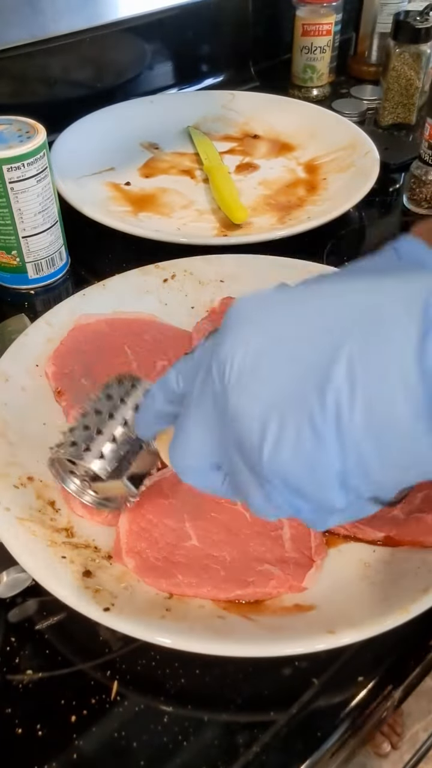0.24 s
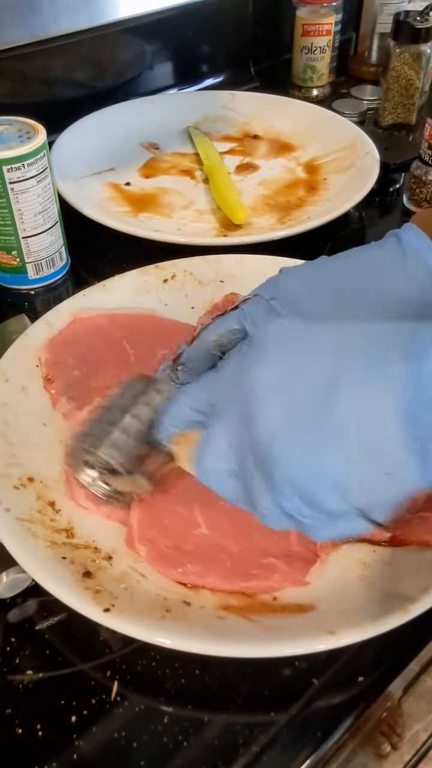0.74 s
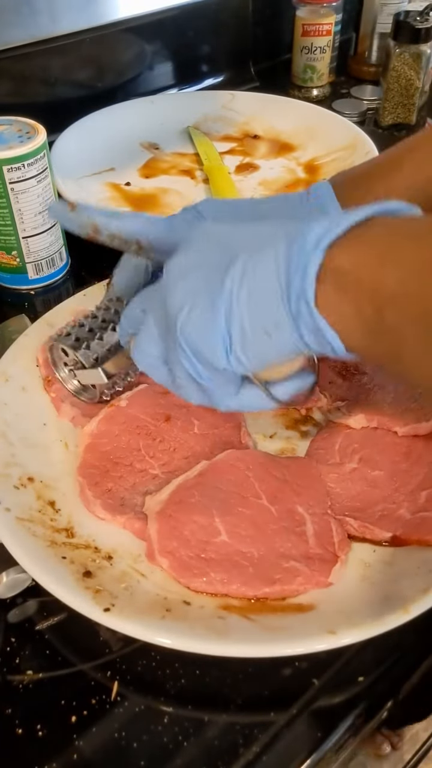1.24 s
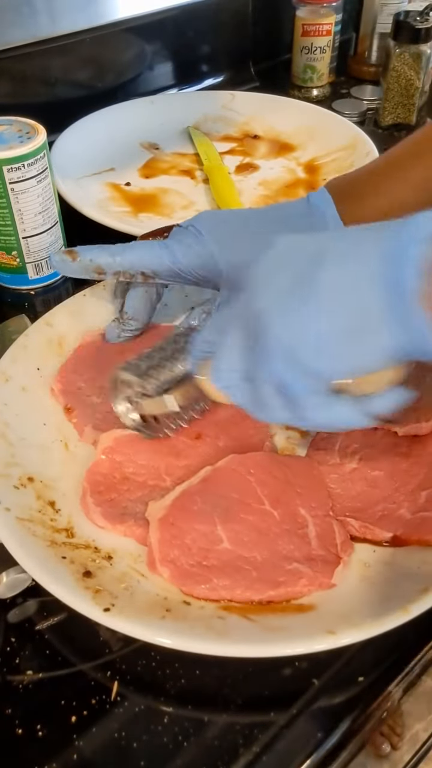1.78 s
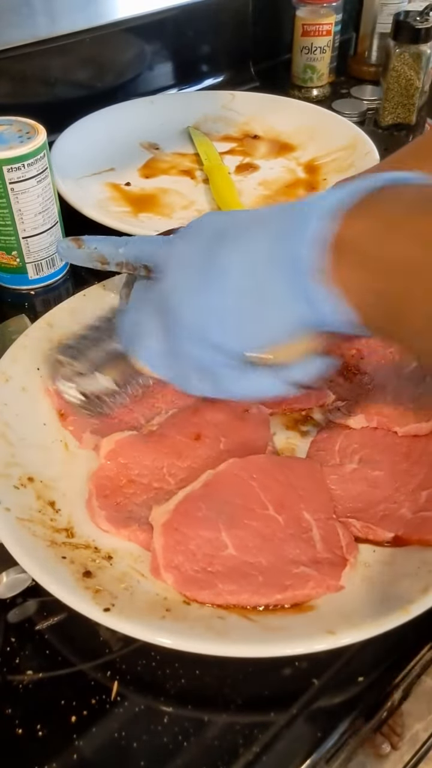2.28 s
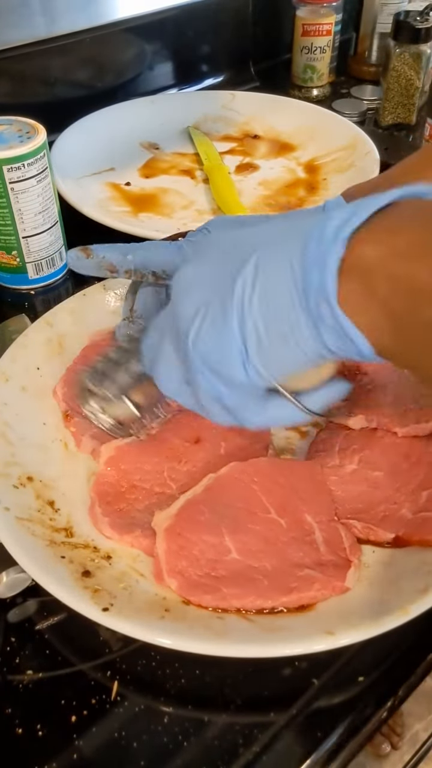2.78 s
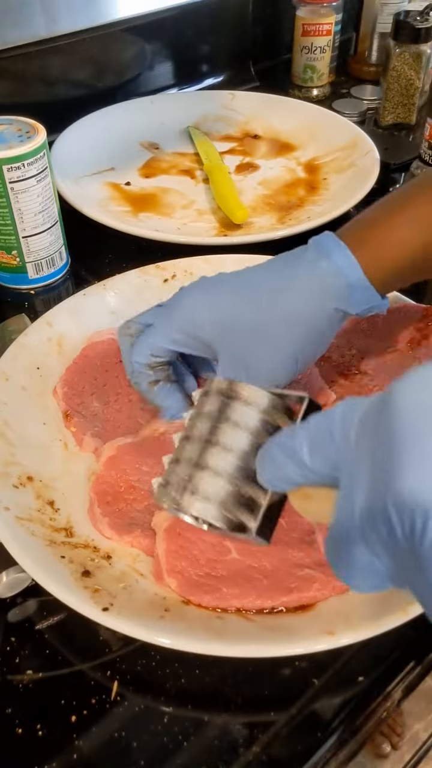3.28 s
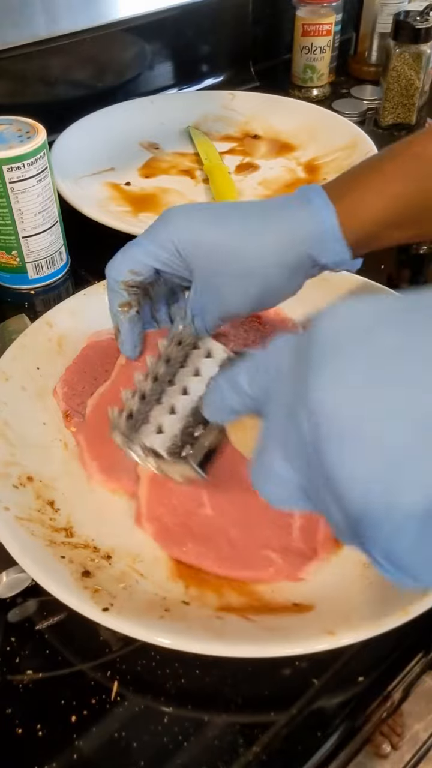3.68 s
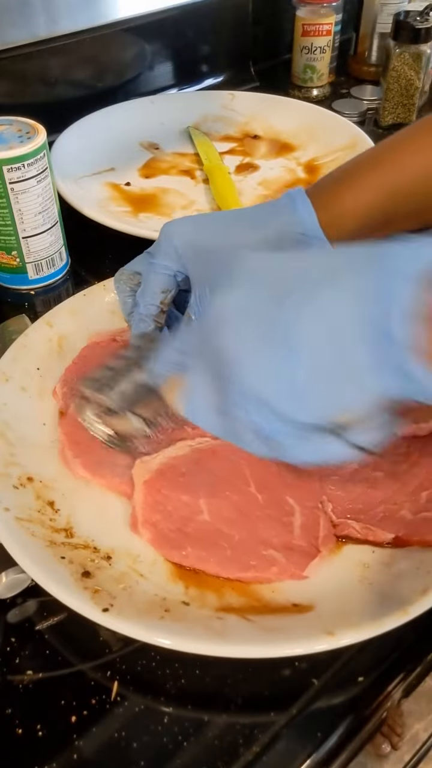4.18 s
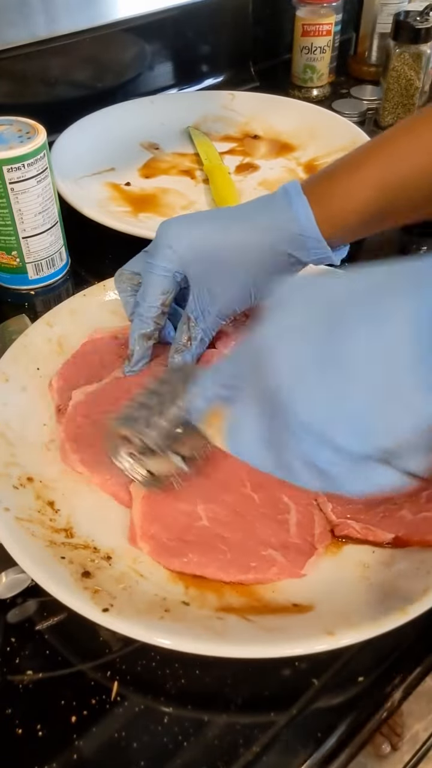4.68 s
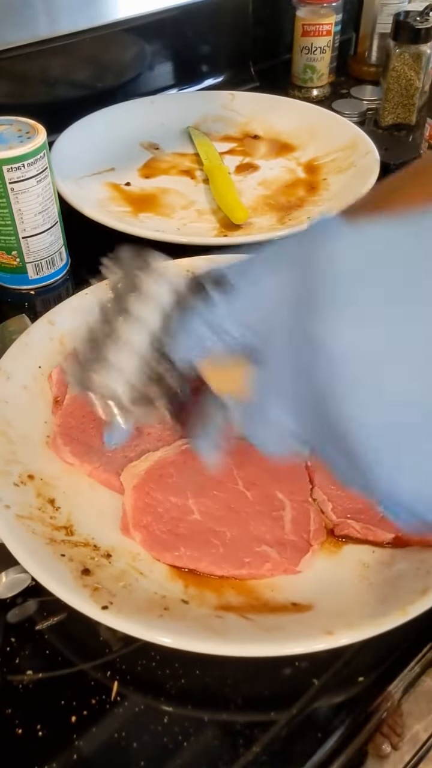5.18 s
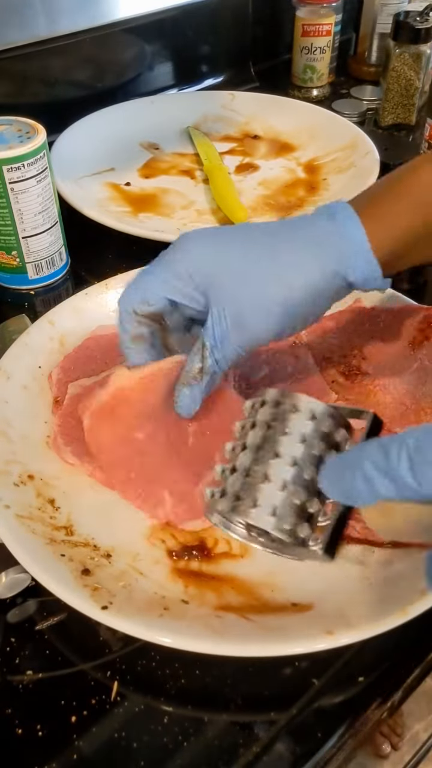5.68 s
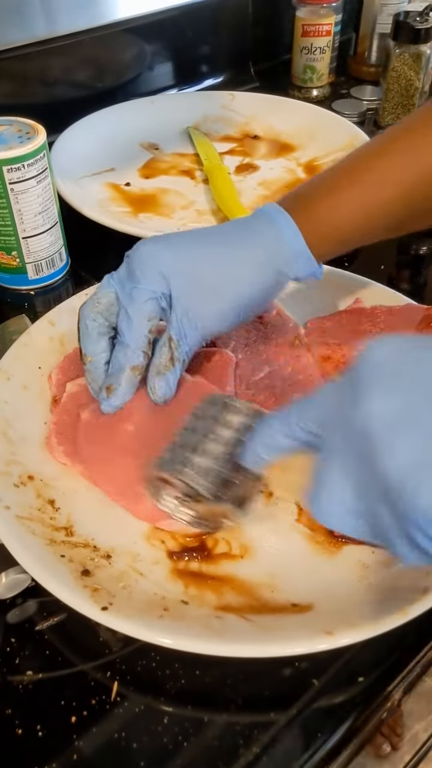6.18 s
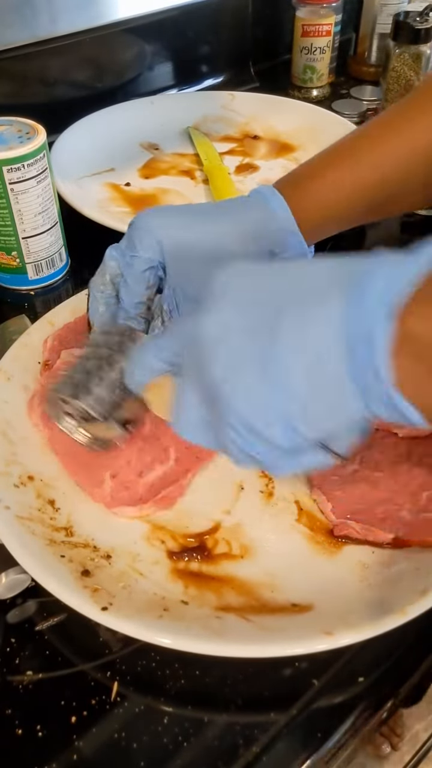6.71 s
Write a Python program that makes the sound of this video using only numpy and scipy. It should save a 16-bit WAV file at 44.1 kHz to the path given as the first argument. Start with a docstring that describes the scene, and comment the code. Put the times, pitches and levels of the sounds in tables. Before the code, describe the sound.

A spiked steel roller works over raw steaks on a plate, heard close up in a kitchen with slight reverberation and a faint, wavering low hum. From the start to about 1.5 seconds its loose drum clinks and rattles in quick, bright clusters, with a few dull knocks of the plate on a stone counter. A quieter stretch follows, with small wet ticks and crackles as the spikes pull out of the meat. Sharp clinks return from 2.7 to 3 seconds, and again near 3.9. Soft squelches and light plate knocks lead to a firmer knock at 5 seconds and two metallic rattles just after. A loud clink with plate knocks lands at 6 seconds, more clinks follow around 6.4 to 6.7, and a hard knock and clink come together near 6.9. Faint plate rubbing and counter rumble swell with the strokes.

```python
"""Spiked roller on steaks

A spiked steel roller is pushed to and fro over thin steaks on a dinner plate, close up in a kitchen.
The loose drum clinks and chatters on its axle, the plate rubs, rocks and knocks on the stone counter,
and the spikes tick and crackle out of the wet meat. A low hum wavers behind."""
import sys
import numpy as np
from scipy import signal
from scipy.fft import rfft, irfft, next_fast_len
from scipy.io import wavfile
from scipy.ndimage import map_coordinates

SR = 44100
rng = np.random.default_rng(int(sys.argv[2]) if len(sys.argv) > 2 else 0)


def int16_out(signal):
    """Quantize to a 16-bit WAV file."""
    q = np.round(np.clip(np.atleast_2d(signal).T, -1, 1) * 32767)
    wavfile.write(sys.argv[1], SR, q.astype(np.int16))


N = 306362

# Drum hits on the axle: t/s, crack/dB, chatter/dB, chatter decay/s, high ring/dB, low ring/dB,
# EQ at 2.5 kHz/dB, EQ at 12 kHz/dB, pan left/dB
AXLE_HITS = [(0.0, -21.5, -27, .12, -33, -61, 2, -7, -2.5),
             (0.1403, -46, -20.5, 0.074, -39, -36, -7.5, -5.5, -4.5),
             (0.3091, -21, -20, 0.05, -30.5, -42, -4.5, -5, -3),
             (0.326, -24, -35, 0.12, -61, -48, 9, -5, 1.1),
             (0.406, -13.5, -40, 0.14, -62, -60, 11, -1, -2.5),
             (0.548, -10.5, -37.5, .17, -67, -65, 3.5, 1, 1),
             (.89, -15, -40, 0.16, -66, -54, 6.5, -2.5, 0.5),
             (0.925, -40, -45.5, 0.14, -70, -40, 16, -13, -12),
             (0.9643, -17, -57, .09, -46, -56, -5, -6, 1.1),
             (.989, -13.5, -19, 0.078, -48, -30, -2.5, -0.5, -5),
             (1.1456, -14.5, -37, 0.1, -43, -56, -4, -10, 1.1),
             (1.209, -39, -34, 0.053, -67, -67, 2, -5, -3.5),
             (1.4656, -15.5, -47, 0.19, -74, -56.5, -1.5, 1.5, 0.5),
             (2.6896, -7, -38.5, 0.11, -50, -61, -0.5, 0, -.6),
             (2.7669, -9.5, -36.5, .13, -49.5, -63, -4.5, -4, 0.5),
             (2.784, -28, -45.5, .1, -65, -62.5, -7, 0.5, 1),
             (2.8505, -17, -21, 0.073, -26.5, -41, 2, -3, -3),
             (2.9264, -17.5, -24, 0.095, -34.5, -51.5, -6.5, -9.5, -3.5),
             (2.932, -15, -46.5, 0.056, -45, -48, -9, 4.5, -15),
             (3.8818, -28, -24.5, 0.14, -30, -35, -5.5, -3.5, -4.5),
             (3.888, -10.5, -20.5, 0.053, -42.5, -53, -9, 2, -1),
             (5.044, -18, -18.5, 0.065, -35.5, -37, -0.5, -9, -5),
             (5.236, -15.5, -25.5, 0.12, -35, -37.5, -7, -15, -5),
             (5.245, -25.5, -26.5, 0.042, -46.5, -35, -25, -13, -1.5),
             (5.976, -25, -36.5, .03, -52, -63.5, -14, -4, -6),
             (5.9788, -4, -24, 0.1, -31.5, -53, -13, -2.5, -3.5),
             (6.094, -30, -44.5, 0.25, -58, -68, -6, -17, -10),
             (6.388, -18, -44.5, 0.29, -66, -62, -2, -10.5, -1),
             (6.4536, -14, -24, 0.1, -35.5, -42.5, -8, -4.5, -8),
             (6.464, -24, -41, .12, -58, -38, 4.5, -10.5, 5),
             (6.6283, -14, -22.5, 0.078, -33, -66, -29, -7.5, -3.5),
             (6.637, -17, -54, .083, -62, -43.5, -9, -8, 14.5),
             (6.672, -21.5, -34.5, 0.15, -60, -59, 3, -11, -4),
             (6.918, -9, -21.5, 0.045, -50, -35, 28, 9.5, 5.3),
             (6.93, -30, -25, 0.052, -38, -50, 22, -13, -2.1)]
# Steel drum modes: f/Hz, level/dB, t60/s
DRUM_MODES = [(2990, 0, .16), (4550, -12, .5), (4910, -15, .15), (5490, -14, .15), (5900, -17, .15),
              (6500, -18, .15), (7630, -16, .22), (7920, -5, .36), (8065, 0, .24), (8200, -8, .42),
              (8400, -10, .3), (8800, -16, .15), (12720, -20, .1)]
# Steel chattering on steel: f/Hz, level/dB
CHATTER_SPECTRUM = [(290, -54.5), (500, -32), (1100, -22), (2290, -30.5), (3020, -10.5), (4110, -14),
                    (4690, -6.5), (7270, -8.5), (8180, -5.5), (10600, -10), (13400, -3), (15800, -16),
                    (16500, -30.5)]
# Fader moves that follow the strokes: t/s, plate rub/dB, counter rumble/dB
STROKES = [(0.0, -56, -76), (0.85, -88, -69), (1.1, -69, -52), (1.39, -81.5, -66.5), (2.01, -81.5, -63.5),
           (2.86, -70.5, -58.5), (3.0, -85.5, -73), (3.77, -87.5, -70.5), (4.02, -80, -73),
           (4.53, -76, -61.5), (4.78, -70, -55.5), (4.99, -62, -56.5), (5.11, -58.5, -60.5),
           (5.45, -88.5, -72), (5.8, -83, -68.5), (6.21, -95, -60), (6.54, -93, -64), (6.95, -60, -42)]
# Plate friction: f/Hz, level/dB
RUB_SPECTRUM = [(500, -52), (700, -13.5), (1200, -13.5), (1450, 7), (1700, -7.5), (2500, -9.5),
                (4000, -61.5)]
# Counter under the roller: f/Hz, level/dB
RUMBLE_SPECTRUM = [(20, -61.5), (40, -17.5), (60, -1.5), (125, -4.5), (170, -12.5), (400, -22), (800, -65)]
# Kitchen room tone: f/Hz, level/dB
ROOM_SPECTRUM = [(15, -46), (25, 4), (74, -5), (159, -11), (220, -2), (358, -22), (726, -32), (1430, -40),
                 (1640, -46), (4020, -36), (5570, -26.5), (10700, -37), (12600, -31), (15200, -34),
                 (16500, -49.5)]
# Plate landings: t/s, level/dB, thud below 300 Hz/dB, EQ at 700 Hz/dB, EQ at 2 kHz/dB,
# EQ at 4.5 kHz/dB, damping t60/s, pan left/dB
PLATE_LANDINGS = [(.002, -54.5, 1.5, -19.5, -4, -3, 0.28, 11), (0.345, -32.5, -5, -6, -15, -2.5, 0.56, 0.5),
                  (.947, -37, 3.5, 4.5, 11.5, -3.5, 0.11, 7), (.971, -41, -1.5, 1, -6.5, 5, .35, -4.5),
                  (1.148, -46, -12, 9, -35, 4, 0.12, -2), (1.23, -52, -1.5, -3, -30, 7, 0.16, -4),
                  (1.669, -57, -13, -15, -5, 8, 0.18, 9), (1.699, -64.5, 6, 6.5, -39, -1, 0.32, 4),
                  (2.005, -74, -11.5, 0, 6, 15, 0.096, 15), (2.036, -74, 10, 9, -17, 7, 0.39, 10),
                  (2.387, -62, 2, -3.5, -2.5, 19.5, .39, 6), (2.637, -72, 9.5, 6.5, -19.5, 4, 0.53, 2.5),
                  (2.755, -52, -0.5, -3.5, -9, 10.5, .39, 2.8),
                  (3.937, -46.5, -1.5, 5, -17.5, -6.5, .19, 5),
                  (3.944, -40.5, -1.5, -21, -24, 19.5, .39, -2), (4.088, -59, -10, -24, -12, 11, 0.33, 8.5),
                  (4.222, -69, -13, -19, 3, 17, .11, 13), (4.545, -60.5, 8.5, 5, -9, 1, .39, 0),
                  (4.587, -36.5, -1.5, -5.5, -17.5, -8.5, .39, -4.7),
                  (4.775, -41, 0.9, -6, -16, -8, 0.398, -0.5), (4.914, -41, -0.5, -6, -22, -17.5, .39, 0),
                  (4.969, -35.5, -8.5, 3.5, 0.2, 0.8, 0.3, 6.5),
                  (4.982, -20, -12.5, 0.7, 4.5, 1.5, 0.067, -4), (5.371, -59.5, 0.5, -12, -19, 10, .28, 4),
                  (5.79, -64, -0.7, -13, -29.5, -14, .28, -1),
                  (5.994, -29, -2.5, -6.5, -12.5, 1.5, 0.3, -0.5),
                  (6.015, -31, -3.5, -4.5, -12, -8, 0.33, -3), (6.401, -64, 11, -8, -12, 6, 0.43, 2),
                  (6.723, -28, -4.5, -6.5, -14.5, -2.1, 0.21, -3.5),
                  (6.917, -17, -13.5, -9.5, -16, 4.5, .22, -2),
                  (6.929, -20.5, -12, -5, -47, -15, .25, -0.5)]
# Plate and counter modes: f/Hz, level/dB, t60/s
PLATE_MODES = [(62, -3.5, 0.38), (125.8, -3, 0.35), (142.4, 5, 0.24), (255, -4, 0.16), (303, 2, 0.088),
               (335.6, 1, 0.13), (420, 1, .1), (682.4, 0.5, 0.14), (905, -1.5, 0.062), (974, -5.5, 0.045),
               (1183, -2.5, 0.069), (1342, -1, 0.26), (1388, 4, 0.12), (1590, -0.5, 0.047),
               (2014, 0.5, 0.16), (2253, 2, 0.08), (2320, -2.5, 0.16), (2354, -8, 0.091),
               (3080, 0.5, 0.023), (4964, -11.5, .08)]
# Plate striking stone: f/Hz, level/dB
CLACK_SPECTRUM = [(59, -42), (100, -23), (373, -3.5), (950, -12), (1360, 2), (5420, -21.5), (5900, -27.5),
                  (7940, -29.5), (16000, -39.5)]
# Plate settling on the counter: f/Hz, level/dB
SHUDDER_SPECTRUM = [(40, -37), (70, -5), (140, -6.5), (350, -4), (600, -8.5), (1200, -49.5)]
# Spikes snapping free: t/s, level/dB, spectrum at 2.5 kHz/dB
SPIKE_SNAPS = [(0.4305, -31.5, 9), (0.4685, -48, -7), (0.794, -45.5, -9), (1.4352, -45.5, 3),
               (1.606, -46.5, -11), (1.629, -45, -6), (1.6598, -41, -3.5), (1.7777, -37, -8),
               (1.7875, -40.5, -10.5), (1.916, -46, -25), (1.95, -42.5, -11), (2.003, -41.5, -1),
               (2.056, -41, -4), (2.0908, -43, -2.1), (2.1207, -43, -2), (2.2457, -48, -25),
               (2.291, -41.5, -11), (2.327, -39, -15), (2.4472, -34.5, -17), (2.4777, -53, 3),
               (2.6445, -48, -20.5), (3.03, -45, -17), (3.3185, -44.5, -26), (3.563, -44, -16.5),
               (3.69, -54, -21.5), (3.759, -52.5, -17.5), (4.221, -47, -17), (4.2433, -45, 0),
               (4.2767, -46, -20), (4.318, -46, -24), (4.491, -43.5, -16), (4.6517, -45.5, -2.1),
               (4.9177, -35, -2), (5.3688, -31.5, -19), (5.889, -51.5, -7), (6.255, -40.5, 9),
               (6.2697, -46, 1), (6.2816, -58, 3), (6.3657, -41, 17), (6.7927, -36, 9), (6.87, -32.5, -14)]
# Spikes tearing through meat: t/s, hold/s, level/dB, fine-bubble gain/dB
MEAT_TEARS = [(0.78, 0.034, -56, 1), (0.85, .015, -62, 3), (1.391, 0.019, -56.5, -3),
              (1.437, 0.018, -57.5, 12), (1.58, 0.14, -65, 3), (1.764, 0.035, -50, 2),
              (1.907, 0.056, -64, 12), (1.993, 0.13, -60, 0), (2.118, 0.054, -55, 4),
              (2.252, 0.042, -65, 9), (2.294, 0.057, -61.5, 2.5), (2.383, 0.072, -60, -2),
              (2.425, 0.084, -52, 3), (2.609, 0.15, -57.5, 9.5), (3.278, 0.079, -66, 10.5),
              (3.381, 0.091, -65, 1.5), (3.503, .03, -70, 0), (3.562, 0.064, -59.5, -3.5),
              (3.752, 0.057, -66, -4), (4.162, 0.094, -54.5, -6), (4.31, 0.071, -61.5, 13.5),
              (4.394, 0.22, -63.5, 1), (4.556, 0.08, -60.5, -1), (4.643, 0.11, -60, 6),
              (4.786, 0.11, -62, 2), (4.895, 0.053, -55.5, 8.5), (5.48, .01, -66, 13.5),
              (5.503, 0.038, -67, 2.5), (5.702, 0.086, -65, -5.5), (5.882, 0.038, -72, -13),
              (6.244, 0.026, -54.5, -5), (6.364, .025, -59, -8), (6.74, 0.088, -49.5, -22),
              (6.863, .05, -47, 2.5)]
# Wet meat crackle: f/Hz, level/dB
CRACKLE_SPECTRUM = [(1470, -34), (2500, -9.5), (3090, -9.5), (3460, -16), (5250, 2), (7090, -4),
                    (7730, -5.5), (13200, -4.5), (15900, -4.5), (16500, -25)]
# Stereo image of diffuse sound: f/Hz, left-right correlation
STEREO_LIKENESS = [(100, 0.98), (500, 0.57), (1500, 0.59), (5000, 0.1), (15000, 0.18)]
# Reverb off the walls: f/Hz, t60/s
WALL_DECAY = [(100, 0.48), (1000, .4), (5000, 0.58), (15000, 0.37)]
# Balance of the close sounds: f/Hz, left over right/dB
BALANCE = [(700, .5), (1300, -2), (2400, 1), (4400, -1.5), (8000, 1), (15000, 2)]


def amp(db):
    """Decibels to gain."""
    return 10 ** (np.asarray(db) / 20)


def unit(x):
    """x scaled to rms 1."""
    return x / np.sqrt(np.mean(x ** 2) + 1e-20)


def along(points, hz):
    """Read a curve of (Hz, value) points on a log frequency axis."""
    f, v = np.transpose(points)
    return np.interp(np.log(hz + 1), np.log(f + 1), v)


def wobble(rate):
    """A smooth random curve, rate knots a second."""
    return map_coordinates(rng.standard_normal(int(N * rate / SR) + 4), [np.arange(N) * rate / SR])


def filtered(x, response):
    """x through a complex frequency response."""
    size = next_fast_len(x.shape[-1] + 4096)
    return irfft(rfft(x, size) * response(np.fft.rfftfreq(size, 1 / SR)), size)[..., :x.shape[-1]]


def noise(spectrum, size):
    """Coloured mono noise of rms 1."""
    return unit(filtered(rng.standard_normal(size), lambda hz: amp(along(spectrum, hz))))


def paired(x, spectrum):
    """Colour two unrelated signals and blend them to left and right, nearly mono in the bass."""
    def blend(hz):
        angle = np.arccos(along(STEREO_LIKENESS, hz)) / 2
        return amp(along(spectrum, hz)) * [np.cos(angle), np.sin(angle)]
    mid, side = filtered(x, blend)
    return np.array([mid + side, mid - side])


def wide(spectrum):
    """Coloured stereo noise of rms 1."""
    return unit(paired(rng.standard_normal((2, N)), spectrum))


def pan(curve, hz):
    """Left and right gains from (Hz, dB left over right) points."""
    return amp(np.outer([.5, -.5], along(curve, hz)))


def place(out, at_s, sound, pan_db, lag_ms, wet_db):
    """Mix in one hit with pan, counter bounce and wall reverb; a negative lag delays the right side."""
    hz, t, bands = signal.stft(rng.standard_normal((2, SR // 2)), SR, nperseg=256)
    tail = signal.istft(bands * amp(-60 * t / along(WALL_DECAY, hz)[:, None]), SR, nperseg=256)[1]
    tail = paired(tail, [(1, 0)])
    tail[:, :int(.003 * SR)] = 0  # pre-delay
    stereo = amp(wet_db) * signal.fftconvolve(sound[None], tail / np.linalg.norm(tail[0]), axes=1)
    lag_s = np.maximum([[lag_ms], [-lag_ms]], 0) / 1000
    bounce_s = rng.uniform(.000778, .003, (2, 1))  # each side has its own path off the counter

    def close_paths(hz):
        direct = pan([(200, .007), (800, pan_db)], hz) * np.exp(-2j * np.pi * hz * lag_s)
        bounce = along([(300, 0), (1000, .85)], hz) * np.exp(-2j * np.pi * hz * bounce_s)
        return direct * (1 + bounce)
    stereo[:, :len(sound)] += filtered(sound, close_paths)
    start = round(at_s * SR)
    out[:, start:start + stereo.shape[1]] += stereo[:, :N - start]


def drum_clinks():
    """The drum hits its axle: a crack, a chatter of small contacts, then the steel rings."""
    out, t = np.zeros((2, N)), np.arange(SR // 3) / SR
    hz, db, t60 = np.transpose(DRUM_MODES)
    edge_eq = [(1500, 6.3), (4000, 1.2), (12000, 4.6)]  # the first contact is the hardest
    for at_s, crack_db, chatter_db, decay_s, high_db, low_db, mid_db, top_db, pan_db in AXLE_HITS:
        eq = [(2500, mid_db), (4500, .0013), (9000, 0), (12000, top_db)]
        colour = [(f, level + along(eq, f)) for f, level in CHATTER_SPECTRUM]
        edge = [(f, level + along(edge_eq, f)) for f, level in colour]
        contacts = amp(2 * np.repeat(rng.standard_normal(len(t) // 60 + 1), 60)[:len(t)])  # 1.4 ms each
        envelope = contacts * amp(chatter_db - 60 * (t / np.clip(decay_s, .02, .2)) ** 1.075)
        crack = noise(edge, len(t)) * amp(crack_db - 60 * t / .0053)
        rattle = (crack + noise(colour, len(t)) * envelope) * (1 - np.exp(-t / .0002))
        steel = ring(hz, db + along([(4600, low_db), (4850, high_db)], hz), t60, t, blur=.0011)
        clink = rattle + steel * (1 - np.exp(-t / .00045))
        place(out, at_s, clink, pan_db, lag_ms=rng.normal(-.12, .2606), wet_db=-11)
    return out


def ring(hz, db, t60, t, blur):
    """Damped modes, varied in level per hit; phases wander because the parts touch while they ring."""
    level = db[:, None] + 2.2 * rng.standard_normal((len(hz), 1)) - 60 * t / t60[:, None]
    drift = blur * np.sqrt(hz[:, None]) * np.cumsum(rng.standard_normal((len(hz), len(t))), axis=1)
    return np.sum(amp(level) * np.sin(2 * np.pi * hz[:, None] * t + drift), axis=0)


def rolling():
    """The plate rubs and the counter rumbles, swelling with each stroke."""
    t = np.arange(N) / SR
    times, rub_db, rumble_db = np.transpose(STROKES)
    rub = wide(RUB_SPECTRUM) * amp(np.interp(t, times, rub_db) + 3.5 * wobble(21))
    rumble = wide(RUMBLE_SPECTRUM) * amp(np.interp(t, times, rumble_db) + 3 * wobble(14))
    return rub + rumble


def room_tone():
    """A steady kitchen bed and a narrow, wavering hum at 220 Hz."""
    hum = wide([(150, -65.5), (200, -28), (220, 0), (240, -13), (320, -65.5)]) * amp(2 * wobble(2.1))
    return amp(-61) * wide(ROOM_SPECTRUM) + amp(-66) * hum


def plate_knocks():
    """The plate tips under the push and lands on the stone: a clack, a ringing body, a low shudder."""
    out, t = np.zeros((2, N)), np.arange(SR // 3) / SR
    hz, db, t60 = np.transpose(PLATE_MODES)
    for at_s, level_db, thud_db, hollow_db, bright_db, top_db, damping_s, pan_db in PLATE_LANDINGS:
        eq = [(300, thud_db), (700, hollow_db), (950, .0028),
              (1200, bright_db / 4), (2000, bright_db), (4500, top_db)]
        damped_t60 = 1 / (1 / t60 + np.clip(hz / 700, 0, 1) / damping_s)  # meat and hands mute the highs
        body = ring(hz, db + along(eq, hz), damped_t60, t, blur=.0009)
        colour = [(f, level + along(eq, f)) for f, level in CLACK_SPECTRUM]
        clack = noise(colour, len(t)) * amp(8.5 - 60 * t / .037)
        shudder = noise(SHUDDER_SPECTRUM, len(t)) * amp(thud_db - 4.5 - 60 * t / .27)
        knock = amp(level_db) * (body + clack + shudder) * (1 - np.exp(-t / .00088))
        place(out, at_s, knock, pan_db, lag_ms=-.13, wet_db=-8)
    return out


def spike_snaps():
    """Single spikes pull out of the meat with a wet tick."""
    out, t = np.zeros((2, N)), np.arange(SR // 20) / SR
    for at_s, level_db, mid_db in SPIKE_SNAPS:
        colour = [(600, -71), (1200, mid_db - 5.5), (2500, mid_db)] + list(CRACKLE_SPECTRUM[2:])
        tick = noise(colour, len(t)) * amp(level_db - 60 * t / .0051)
        place(out, at_s, tick, pan_db=rng.normal(0, 3.3), lag_ms=-.13, wet_db=-1)
    return out


def meat_squelches(grains_per_s=400, grain_s=.0012, attack_s=.0044, release_t60=.075):
    """Spikes tear through wet meat, which crackles in clumps of tiny grains."""
    t = np.arange(N) / SR
    pops = (rng.random(N) < grains_per_s / SR) * amp(3.5 * np.minimum(rng.exponential(size=N), 3))
    grains = signal.lfilter([1], [1, -np.exp(-1 / (grain_s * SR))], pops)
    fizz = unit(wide(CRACKLE_SPECTRUM) * (.4 + grains) * amp(2.5 * wobble(25)))
    fine = filtered(fizz, lambda hz: along([(8000, 0), (11500, .83)], hz))  # the smallest bubbles
    coarse_gain, fine_gain = np.zeros((2, N))
    for at_s, hold_s, level_db, fine_db in MEAT_TEARS:
        attack = np.clip((t - at_s) / attack_s, 0, 1)
        envelope = attack * amp(level_db - 60 * np.maximum(t - at_s - hold_s, 0) / release_t60)
        coarse_gain += envelope
        fine_gain += amp(fine_db) * envelope
    return coarse_gain * (fizz - fine) + fine_gain * fine


def scene():
    """Roller, plate and meat up front, the kitchen behind."""
    close = drum_clinks() + plate_knocks() + spike_snaps() + meat_squelches() + rolling()
    return filtered(close, lambda hz: pan(BALANCE, hz)) + room_tone()


def record(dry):
    """Small microphones lose the deep bass, round off the hardest peaks and cut the very top."""
    low_cut_hz, ceiling, top_hz = 45, .9, 16000
    thinned = filtered(dry, lambda hz: (1j * hz / (low_cut_hz + 1j * hz)) ** 3)
    rounded = thinned / (1 + np.abs(thinned / ceiling) ** 4) ** .25
    return filtered(rounded, lambda hz: amp(-60 * np.clip((hz - top_hz) / 1100, 0, 2)))


dry = scene()
out = record(dry)
int16_out(out)
```